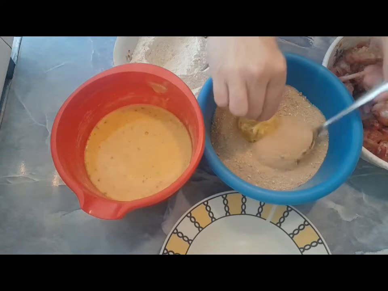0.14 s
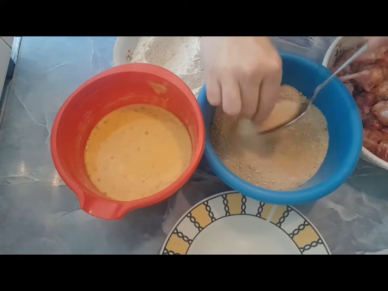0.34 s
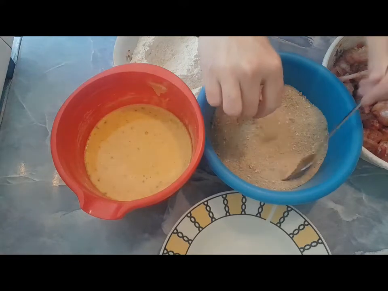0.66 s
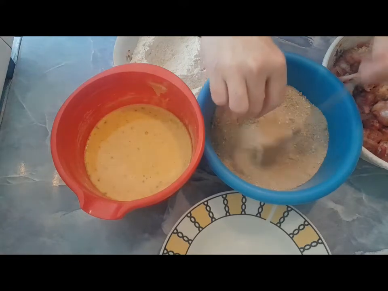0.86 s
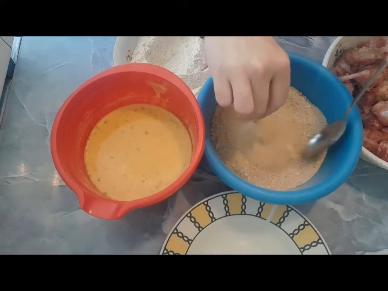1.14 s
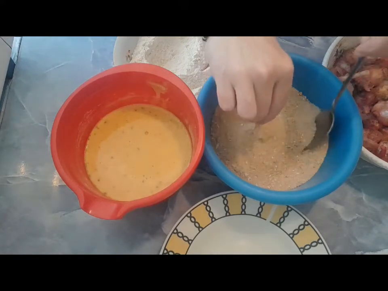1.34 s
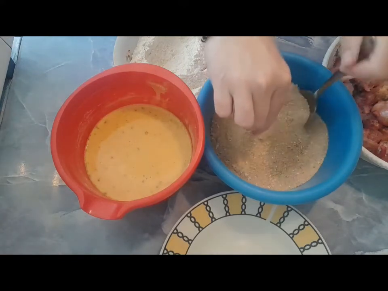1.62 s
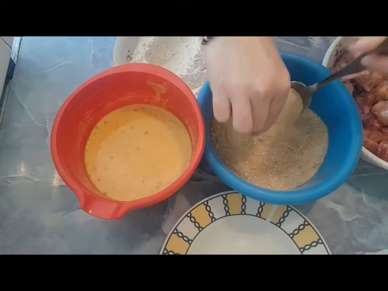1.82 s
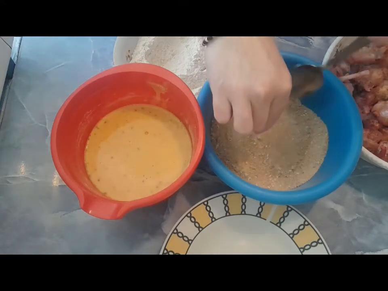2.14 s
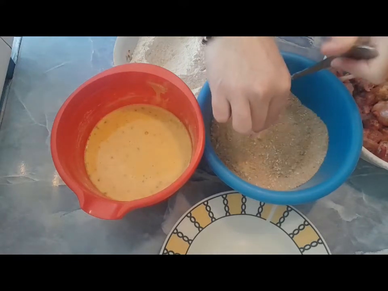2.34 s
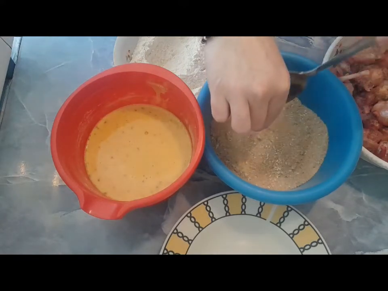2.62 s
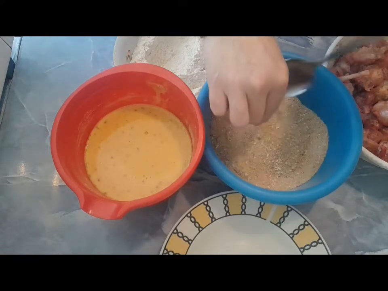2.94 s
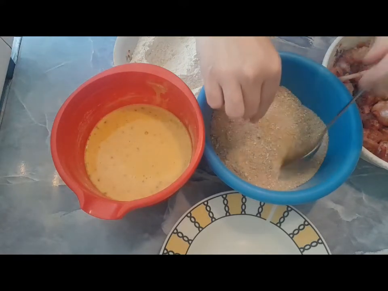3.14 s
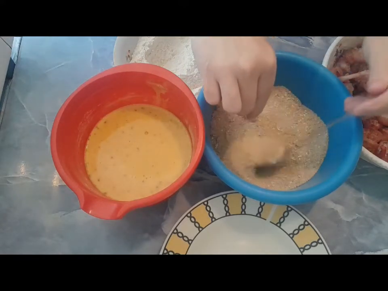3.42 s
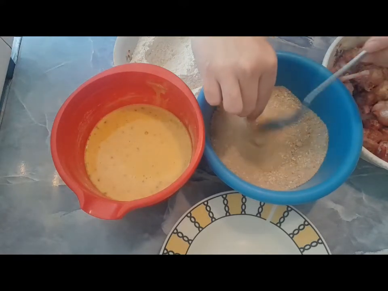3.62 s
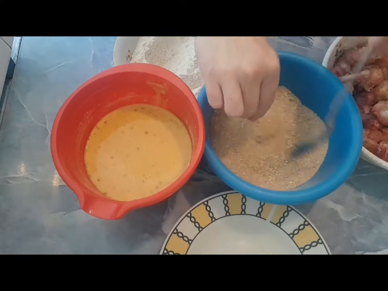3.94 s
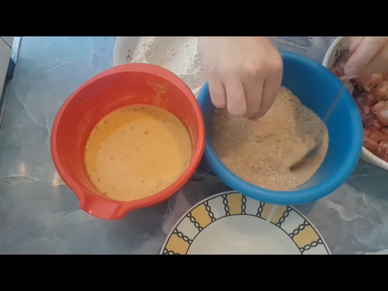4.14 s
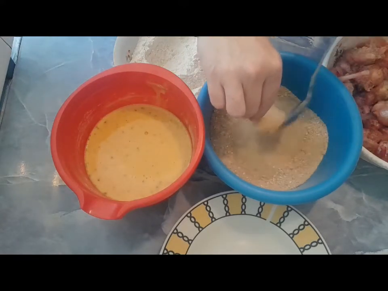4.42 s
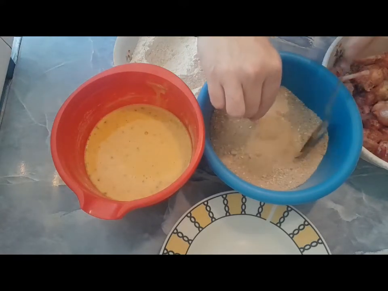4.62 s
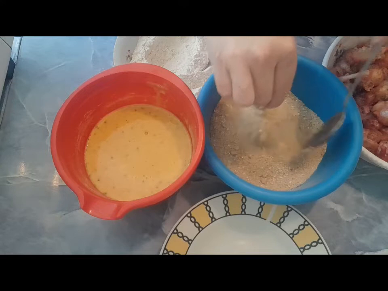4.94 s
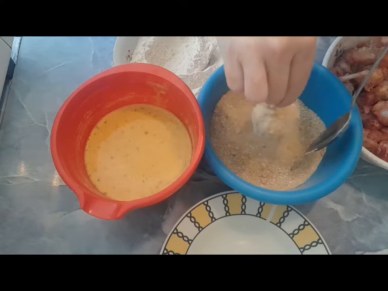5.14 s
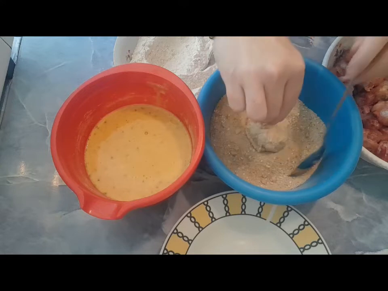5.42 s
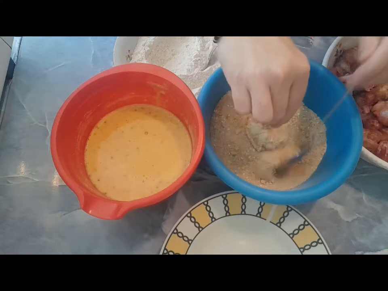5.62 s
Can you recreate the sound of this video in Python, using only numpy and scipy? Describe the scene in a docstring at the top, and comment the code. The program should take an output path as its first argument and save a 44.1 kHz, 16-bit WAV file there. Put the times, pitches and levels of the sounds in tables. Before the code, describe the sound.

Close-up, a metal spoon works through breadcrumbs in a plastic bowl. It opens with a hollow knock, then separate strokes hiss brightly, deepen into gritty crunch and drag on plastic. Light skims and pauses fall between. Firmer knocks come just past three seconds and, strongest, near five and a half. Small kitchen with short reflections; close stereo microphones, bowl slightly right; faint dull background noise.

```python
"""Bright hisses of crumbs on steel deepen to a crunch and drag on plastic; some strokes end in a hollow knock.
A steel spoon scoops breadcrumbs over a piece of food in a plastic bowl, in a small kitchen.
Filtered random clicks make the hiss and crunch; the bowl's decaying tones make the drag and knocks.
Underneath, filtered noise makes a dull background that swells and sinks, with a faint rough whine."""
import sys
import numpy as np
from scipy import signal
from scipy.fft import rfft, irfft, next_fast_len
from scipy.io import wavfile

SR = 44100
rng = np.random.default_rng(int(sys.argv[2]) if len(sys.argv) > 2 else 0)


def generate_wav(sig):
    """Save sig (samples, or channels by samples) to the path in sys.argv[1] as 16-bit PCM at SR."""
    pcm = np.round(np.clip(np.atleast_2d(sig).T, -1, 1) * 32767).astype(np.int16)
    wavfile.write(sys.argv[1], SR, pcm)


N = 254456
TIME = np.arange(N) / SR
HALF_SECOND = TIME[:SR // 2]

# ways the plastic bowl and, last, the table under it vibrate:
# (pitch [Hz], relative level [dB], time to fall by 60 dB when left free [s])
BOWL_MODES = [(117.2, 5.5, 0.27), (127, 3, 0.32), (157.3, 3, 0.34), (214.2, -6.5, 0.3), (265.9, -7, 0.21),
              (302.2, -13, 0.29), (335.9, -8.5, 0.19), (520.3, -10.5, 0.22), (559.3, -10, 0.27),
              (611.4, -13, 0.15), (764, -15.5, 0.19), (817, -12, 0.12), (942, -7, 0.056),
              (1176, -25.5, 0.14), (1262, -20, 0.15), (1315, -23, 0.065), (1497, -10, 0.067),
              (1762, -11.5, 0.075), (49.6, -17, 0.29)]
MODE_HZ = np.array(BOWL_MODES)[:, 0]


def undb(db):
    """Turn decibels into gain."""
    return 10 ** (np.asarray(db) / 20)


def unit(x):
    """Scale to an average (rms) strength of 1."""
    return x / np.sqrt(np.mean(x ** 2))


def unit_energy(x):
    """Scale each channel to a total energy of 1."""
    return x / np.linalg.norm(x, axis=-1, keepdims=True)


def decay(t, t60):
    """Natural dying away: 60 dB quieter after t60 seconds."""
    return np.exp(-np.log(1000) * t / t60)


def over_hz(points, size):
    """Read (pitch [Hz], value) points at every frequency of a sound of this size."""
    hz, value = np.transpose(points)
    bins_hz = np.fft.rfftfreq(size, 1 / SR)
    return np.interp(np.log(bins_hz + 1), np.log(hz), value)


def colour(x, points):
    """Filter a sound by (pitch [Hz], level [dB]) points."""
    size = next_fast_len(x.shape[-1] + 2048)
    spectrum = rfft(x, size) * undb(over_hz(points, size))
    return irfft(spectrum, size)[..., :x.shape[-1]]


def resonate(x, hz, width_hz):
    """Let through one resonance, with gain 1 at its centre."""
    hz = min(hz, 0.45 * SR)
    b, a = signal.iirpeak(hz, hz / min(width_hz, SR / 4), fs=SR)
    return signal.lfilter(b, a, x)


def convolve(x, response):
    """Start a copy of the response at every sample of a sound."""
    return signal.fftconvolve(x, response, axes=-1)[..., :N]


def walk(rate):
    """Wander along straight lines between random points, rate points a second; rms 1."""
    steps = rng.standard_normal(N // 50)
    return unit(np.interp(TIME * rate, np.arange(len(steps)), steps))


def grains(rate, spread_db):
    """Random clicks, about rate a second, of random size and sign; rms 1."""
    size = undb(spread_db * np.minimum(rng.exponential(size=N), 5))
    happens = rng.random(N) < rate / SR
    return unit(happens * size * rng.choice([-1, 1], N))


def diffuse(size):
    """Stereo noise from all around: alike in the bass, unrelated in the treble."""
    # how alike the two channels are: (pitch [Hz], likeness [0-1])
    likeness = [(130, 0.82), (300, 0.49), (640, 0), (1400, 0), (3000, 0)]
    mid, side = rfft(rng.standard_normal((2, size)))
    alike = np.clip(over_hz(likeness, size), 0, 1)
    shared = mid * np.sqrt((1 + alike) / 2)
    opposed = np.array([[1], [-1]]) * side * np.sqrt((1 - alike) / 2)
    return irfft(shared + opposed, size)


def flatten(burst):
    """Even out the spectrum of a noise burst, so that it colours sound less."""
    spectrum = rfft(burst)
    strength = np.abs(spectrum)
    return irfft(spectrum / (strength + 0.3 * strength.mean()), burst.shape[-1])


def background(flicker_db=-2.0, rumble_follows=0.47, whine_hz=1595, whine_width_hz=110, whine_db=-80):
    """A dull noise swells and sinks, its bass and the rest wavering apart, with a faint rough whine."""
    # colour of the noise: (pitch [Hz], level [dB])
    noise_colour = [(25, -15), (50, -4), (90, -4.5), (145, 5.5), (220, 2), (350, -6.5), (460, -20.5),
                    (535, -6.5), (690, -15.5), (960, -7.5), (1350, -18.5), (1580, -21), (2000, -33),
                    (6500, -38.5), (8500, -47), (9700, -30), (15000, -33.5)]
    # level of the noise before its wavering; the bass follows only in part: (time [s], level [dB])
    swell = [(0, -43), (0.28, -67), (0.45, -57), (0.8, -62.5), (1.12, -63.5), (1.85, -59.5), (2.1, -72),
             (3.05, -66.5), (3.62, -61), (3.8, -56), (4.0, -59.5), (4.4, -61.5), (4.9, -66), (5.15, -76),
             (5.3, -64.5), (5.77, -73)]
    swell_db = np.interp(TIME, *np.transpose(swell))
    noise = unit(colour(diffuse(N), noise_colour))
    rumble = signal.sosfiltfilt(signal.butter(2, 400, fs=SR, output="sos"), noise)
    rumble_db = swell_db.mean() + rumble_follows * (swell_db - swell_db.mean())
    whine = resonate(diffuse(N), whine_hz, whine_width_hz)
    whine = unit(resonate(whine, whine_hz, whine_width_hz))
    return (rumble * undb(rumble_db + flicker_db * walk(rate=21))
            + (noise - rumble) * undb(swell_db + flicker_db * walk(rate=14))
            + whine * undb(whine_db + 0.77 * walk(rate=2.1)))


def ramp(start_s, length_s):
    """Rise in a straight line from 0 to 1."""
    return np.clip((TIME - start_s) / length_s, 0, 1)


def fall(start_s, db_per_s):
    """Gain that sinks steadily in decibels from the start time."""
    return undb(-db_per_s * np.maximum(TIME - start_s, 0))


def release(stop_s, stop_db_per_s=154, trickle_db=-13.5, trickle_db_per_s=50.5):
    """The spoon slows, so the sound falls quickly, then disturbed crumbs go on sliding."""
    after = np.maximum(TIME - stop_s, 0)
    return undb(np.maximum(-stop_db_per_s * after, trickle_db - trickle_db_per_s * after))


def stirring():
    """Levels [dB] of drag, crunch and hiss: strokes hiss on entry, then dig; skims swell and lift off."""
    # the spoon digs into the heap; levels before scraping() lowers each layer a little:
    # (enters [s], time to deepest point [s], entry hiss [dB],
    # change from entry to deepest point [dB], negative sinks,
    # then at the deepest point: hiss [dB], crunch [dB], drag on the bowl [dB])
    strokes = [(-0.08, 0.088, -60, -20, -53.5, -48.5, -37.5), (0.576, 0.11, -55, 10, -53.5, -48, -43),
               (1.155, 0.017, -53, -18, -60, -59.5, -45), (1.209, 0.12, -65, 19, -57, -52.5, -45),
               (1.338, 0.21, -75, 4.5, -54.5, -50, -48.5), (2.166, 0.077, -44, 10.5, -50.5, -45, -50),
               (3.08, 0.16, -49.5, 21, -50.5, -44.5, -43), (4.016, 0.13, -47, 10.5, -52.5, -50.5, -41.5),
               (4.575, 0.05, -60, -2, -55, -51.5, -44), (5.374, 0.088, -66, 4.5, -45.5, -45, -38.5)]
    # the spoon skims the heap or sheds crumbs, levels as above:
    # (start [s], length [s], hiss [dB], crunch [dB])
    skims = [(0.313, 0.11, -70, -68), (0.816, 0.085, -68.5, -92), (1.731, 0.13, -57.5, -67),
             (2.284, 0.11, -58.5, -62), (2.775, 0.053, -69, -77), (3.372, 0.11, -65, -67),
             (3.739, 0.035, -48.5, -64), (4.34, 0.16, -80, -71), (5.21, 0.027, -73.5, -79),
             (5.64, 0.046, -58, -75)]
    entry_s, entry_fade_db_per_s = 0.024, 146  # breaking the surface; first hiss dies as steel is covered
    dig_power = 1.56  # most of the change comes late in the dig
    skim_rise = 0.72  # share of a skim spent swelling
    skim_fade_db = 13.5  # fall over one skim length: a slow skim also ends slowly
    skim_drag_db = 5.5  # drag of a skim, relative to its crunch

    # the fingers keep working in the bowl
    rest_db = [[-65.5], [-82], [-83]]
    power = undb(rest_db) ** 2 * np.ones(N)
    for enters, dig_s, entry_db, change_db, hiss_db, crunch_db, drag_db in strokes:
        contact = ramp(enters, entry_s) * release(enters + dig_s)
        progress = ramp(enters, dig_s) ** dig_power
        digging = contact * undb(change_db * (progress - 1))
        power += (undb([[drag_db], [crunch_db], [hiss_db]]) * digging) ** 2
        entry_hiss = contact * undb(entry_db) * fall(enters, entry_fade_db_per_s)
        power[2] += entry_hiss ** 2
    for start, length_s, hiss_db, crunch_db in skims:
        contact = ramp(start, skim_rise * length_s) * fall(start + length_s, skim_fade_db / length_s)
        power += (undb([[crunch_db + skim_drag_db], [crunch_db], [hiss_db]]) * contact) ** 2
    return 10 * np.log10(power)


def bowl_ring(weights):
    """The bowl after one push: a dying tone for each mode, scaled by its weight."""
    ring = np.zeros(len(HALF_SECOND))
    for k, ((hz, db, t60), weight) in enumerate(zip(BOWL_MODES, weights)):
        tone = np.sin(2 * np.pi * hz * HALF_SECOND) * decay(HALF_SECOND, t60)
        ring += (-1) ** k * weight * undb(db) * tone  # every other mode starts the opposite way
    return ring


def scraping(drag_db, crunch_db, hiss_db, buried_db=0.5, wall_hz=175):
    """Crumbs break under the spoon, tick on its steel and make it judder along the bowl."""
    # rings of the spoon, damped by the crumbs: (pitch [Hz], width [Hz], relative level [dB])
    spoon_rings = [(5310, 260, -8.5), (6530, 230, -11), (9540, 120, -16), (10030, 35, 10.5),
                   (13160, 110, 2.5), (13730, 150, 3.5)]
    # colour of breaking crumbs: (pitch [Hz], level [dB])
    crunch_colour = [(250, 5.5), (540, 6), (700, 8), (950, 2.5), (1500, 5.5), (2000, -0.5), (3300, 2.5),
                     (4200, -3.5), (5100, 2.5), (6000, -4.5), (6600, -0.5), (7500, -11.5), (8600, -20),
                     (15000, -48)]
    # colour of the hiss around the buried spoon: (pitch [Hz], level [dB])
    hiss_colour = [(1500, -87), (6500, -5), (8000, -18.5), (8650, -25), (9300, -1), (12000, -3),
                   (15000, -9)]
    # the heap gives way in small jerks
    slips = undb(1.2 * walk(rate=130))
    crunch = unit(colour(grains(rate=2000, spread_db=0.5), crunch_colour))
    crunch = crunch * slips * undb(crunch_db - 1.0)

    ticks = grains(rate=4700, spread_db=-2.0)
    steel = unit(sum(undb(db) * resonate(ticks, hz, width) for hz, width, db in spoon_rings))
    fizz = unit(colour(grains(rate=5000, spread_db=-2.0), hiss_colour))
    # the steel rings while it skims the heap and is damped once it is buried
    free = 1 / (1 + undb(1.34 * (crunch_db + buried_db - hiss_db)))
    hiss = np.sqrt(free) * steel + np.sqrt(1 - free) * fizz
    hiss = hiss * slips * undb(hiss_db - 2.0)

    # pressed against the wall, the spoon damps the bowl and hardly moves its deepest modes
    ring = bowl_ring(np.minimum(MODE_HZ / wall_hz, 1) ** 2) * np.exp(-HALF_SECOND / 0.077)
    judder = grains(rate=1100, spread_db=2.5) * slips * undb(drag_db - 4.0)
    return crunch + hiss, convolve(judder, unit_energy(ring))


def knocks(focus=1.46, clack_width=0.88, tock_s=0.0033, tock_db=-4.5, crush_db=-5.0):
    """Spoon meets bowl: each row adds a clack and a bowl ring, strongest in the modes its spot favours."""
    # rows a few milliseconds apart make one knock:
    # (time [s], thud [dB], pitch the spot favours [Hz],
    # clack before its trims and colour [dB], clack centre [Hz], crushing decay time [s])
    knock_parts = [(0.0429, -42, 51.6, -28.5, 1534, 0.0022), (0.0444, -49, 1270, -24.5, 1293, 0.0025),
                   (0.046, -44.5, 410, -38, 3780, 0.0054), (0.99, -74, 300, -53, 3600, 0.0021),
                   (1.1616, -51, 243, -43, 3050, 0.0017), (1.789, -87, 310, -56.5, 3780, 0.004),
                   (2.185, -59.5, 334, -44.5, 3020, 0.016), (2.245, -46, 149, -42.5, 3500, 0.014),
                   (2.409, -76, 306, -45.5, 4700, 0.0076), (3.2446, -53, 54, -35, 1568, 0.0023),
                   (3.248, -38, 214, -29, 560, 0.00087), (4.034, -49, 274, -43, 2390, 0.041),
                   (4.157, -41.5, 91.5, -35.5, 877, 0.012), (4.65, -59, 113, -36.5, 873, 0.014),
                   (5.457, -30, 180, -35, 907, 0.022), (5.4604, -33, 115, -28, 5040, 0.0025)]
    # colour of crumbs crushed in a clack: (pitch [Hz], level [dB])
    clack_colour = [(60, 21), (400, -9), (600, -2), (5000, -3.5), (7500, -4.5), (8650, -9.5), (9800, 2),
                    (12000, -5), (15000, -21)]
    clacks, thuds = np.zeros((2, N + SR))
    t = HALF_SECOND
    for s, thud_db, spot_hz, clack_db, clack_hz, contact_s in knock_parts:
        span = slice(int(s * SR), int(s * SR) + len(t))
        # a stiff spot hardly moves the modes below its own pitch
        nearness = 1 / (1 + (focus * np.log2(MODE_HZ / spot_hz)) ** 2)
        weights = np.minimum(MODE_HZ / spot_hz, 1) * nearness
        ring = bowl_ring(weights) * (1 - np.exp(-t / 0.0025))
        thuds[span] += undb(thud_db) * ring / np.std(ring[:SR // 50])
        # the wall under the spoon flexes briefly: for tock_s at 1 kHz, less at a higher pitch
        age = t / tock_s * np.sqrt(clack_hz / 1000)
        tock = np.sin(2 * np.pi * clack_hz * t) * np.sqrt(age) * np.exp(-age)
        thuds[span] += undb(clack_db + tock_db) * tock / np.abs(tock).max()
        # crumbs caught between spoon and wall draw the contact out
        crush = flatten(rng.standard_normal(len(t)) * np.exp(-t / contact_s))
        crush = crush * (t < 10 * contact_s)
        crush = resonate(crush, clack_hz, clack_width * clack_hz)
        clacks[span] += undb(clack_db + crush_db) * crush / np.std(crush[:SR // 200])
    return colour(clacks[:N], clack_colour), thuds[:N]


def kitchen(x, early_db, tail_db, early_t60_s, room_t60_s=0.25, treble_t60_s=0.13):
    """Direct sound, quick reflections from bowl and table, then the walls; the treble dies first."""
    t = HALF_SECOND
    early = unit_energy(diffuse(len(t)) * decay(t, early_t60_s))
    near = (t == 0) + undb(early_db) * early
    near = unit_energy(flatten(near) * (t < early_t60_s))
    walls = diffuse(len(t))
    dull = signal.sosfilt(signal.butter(1, 3000, fs=SR, output="sos"), walls)
    tail = dull * decay(t, room_t60_s) + (walls - dull) * decay(t, treble_t60_s)
    tail = unit_energy(tail * (1 - np.exp(-t / 0.0037)))
    return convolve(x[None], unit_energy(near + undb(tail_db) * tail))


def scene(left_lag_s=0.0001):
    """Scraping and knocks in the kitchen; each microphone hears the bowl with its own colour."""
    # the two microphones: (pitch [Hz], left minus right [dB])
    balance = [(110, -2), (700, -1), (1300, -2), (2400, -5.5), (4400, -6.5), (8100, 1), (15000, 2.5)]
    crumbs, drag = scraping(*stirring())
    clacks, thuds = knocks()
    # the reflections change as the spoon travels round the bowl
    angle = np.pi * walk(rate=2.5)
    here = kitchen(crumbs * np.cos(angle), early_db=2, tail_db=-11.5, early_t60_s=0.024)
    there = kitchen(crumbs * np.sin(angle), early_db=2, tail_db=-11.5, early_t60_s=0.024)
    clacks = kitchen(clacks, early_db=5.0, tail_db=-5.5, early_t60_s=0.012)
    bowl = kitchen(drag + thuds, early_db=-20, tail_db=-12, early_t60_s=0.07)
    left, right = here + there + clacks + bowl
    # the bowl stands to the right, so its sound reaches the left microphone a little later
    left = np.pad(left, (int(left_lag_s * SR), 0))[:N]
    left = colour(left, [(hz, db / 2) for hz, db in balance])
    right = colour(right, [(hz, -db / 2) for hz, db in balance])
    return np.array([left, right]) + background()


def record(dry, bass_cut_hz=36, top_hz=15000):
    """Cut the deep bass gently and the highest treble steeply."""
    dry = signal.sosfilt(signal.butter(2, bass_cut_hz, "high", fs=SR, output="sos"), dry)
    return signal.sosfilt(signal.ellip(10, 0.2, 80, top_hz, fs=SR, output="sos"), dry)


dry = scene()
out = record(dry)
generate_wav(out)
```